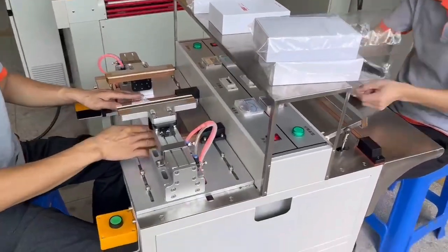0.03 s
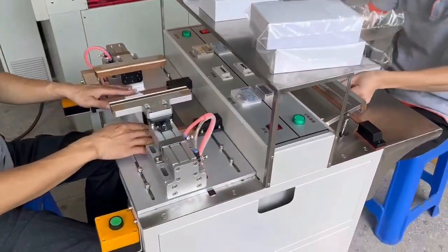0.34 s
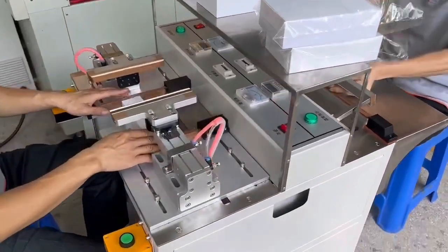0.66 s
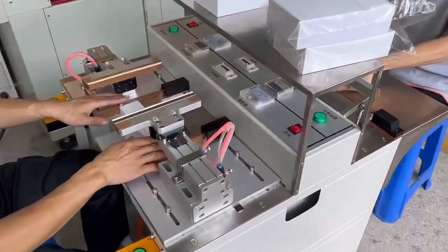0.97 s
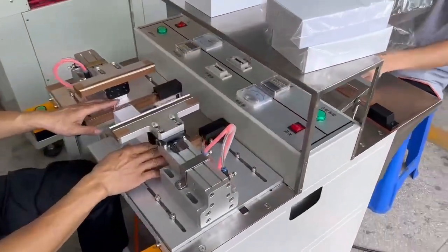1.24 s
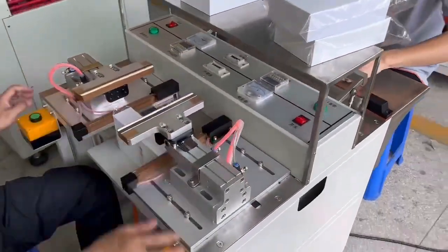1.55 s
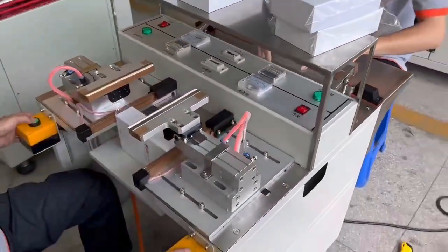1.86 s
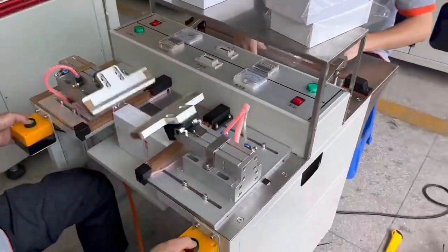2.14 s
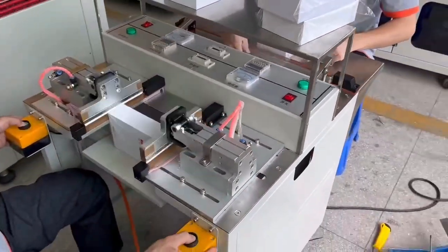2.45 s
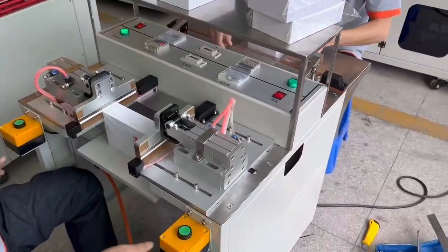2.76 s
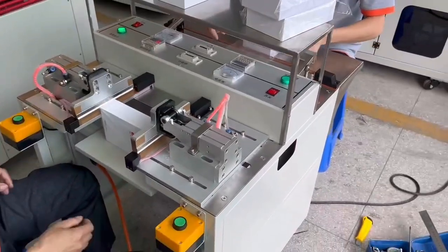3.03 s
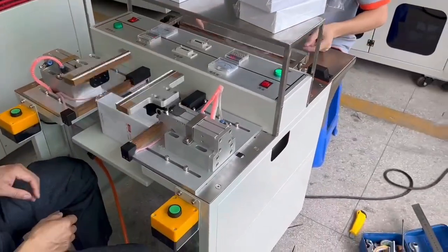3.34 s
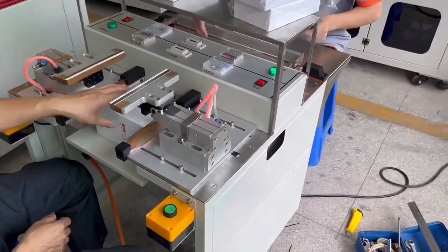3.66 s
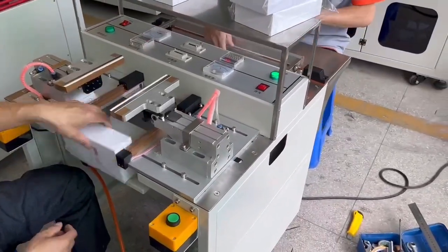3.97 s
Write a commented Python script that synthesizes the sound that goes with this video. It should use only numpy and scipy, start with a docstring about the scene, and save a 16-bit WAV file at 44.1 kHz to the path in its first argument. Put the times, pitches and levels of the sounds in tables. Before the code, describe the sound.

A pneumatic sealing machine hisses, thuds shut and clacks open over steady workshop hum.

```python
"""Pneumatic sealer in a workshop

The microphone stands near the machine, facing its muffler, with motors and fans humming around it.
Valves vent as the clamps thud shut; a second later they vent again and the jaws spring back
against their stops, clacking and setting the sheet-steel cabinet booming.
At the end of this one cycle a hand slides a wrapped box into place."""
import sys
import numpy as np
from scipy import signal
from scipy.fft import rfft, irfft, next_fast_len
from scipy.io import wavfile
from scipy.ndimage import uniform_filter1d, map_coordinates

SR = 44100
rng = np.random.default_rng(int(sys.argv[2]) if len(sys.argv) > 2 else 0)


def inscribe(sig):
    """Save sig as 16-bit PCM at rate SR to the path in sys.argv[1].

    A 1-D sig is mono; a 2-D sig holds one channel per row.
    Samples are clipped to [-1, 1] before scaling.
    """
    pcm = np.round(np.clip(np.atleast_2d(sig).T, -1, 1) * 32767)
    wavfile.write(sys.argv[1], SR, pcm.astype(np.int16))


N = 176400

# Spectra of the background machinery, low to high: freq_hz, density_db
BASS_SPECTRUM = [(25, -29), (48, -14), (58, 4), (67, -1), (80, -20), (130, -84)]
RUMBLE_SPECTRUM = [(10, -25), (22, -16), (36, -22), (55, -2.5), (78, -11), (105, -10.5), (132, -4.5),
                   (155, -9.5), (205, -11), (250, -5), (340, -5.5), (385, -6.5), (445, -13.5), (540, -12),
                   (700, -30), (850, -38), (1760, -83)]
DRONE_SPECTRUM = [(150, -58), (225, -15.5), (262, 5), (278, -2.5), (296, 5.5), (315, 5.5), (332, -17.5),
                  (450, -56.5)]
WHIRR_SPECTRUM = [(350, -25), (600, 0), (736, -3), (880, -2), (1070, -2), (1400, -5.5), (2000, -10.5),
                  (2500, -11.5), (2950, -15), (3500, -14.5), (4300, -19), (5500, -23.5), (7500, -27.5),
                  (10000, -67)]
HISS_SPECTRUM = [(7500, -43), (9000, -1.5), (11600, 5.5), (13000, -1), (14000, -17.5)]
# Swells of the drone and the bass under it: time_s, level_db
DRONE_SWELLS = [(0, -25.5), (.55, -20.5), (.75, -25), (1.08, -22), (1.42, -21.5), (1.55, -34.5),
                (1.88, -21.5), (2.1, -31), (2.8, -24), (3.05, -31.5), (3.7, -23), (4, -33)]
BASS_SWELLS = [(0, -49), (.1, -29.5), (.25, -52), (.36, -44), (.44, -24), (.56, -27), (.68, -43), (2, -36),
               (4, -37)]
# Motor and mains hum: pitch_hz, level_db, unsteadiness
HUM_TONES = [(56.6, -50, 0.64), (101.54, -31.5, 0.28), (181.4, -35, 0.69), (311.7, -38.5, 0.64),
             (564, -43, 0.93), (930, -48, 2.5)]
# Decay of the room: freq_hz, t60_s
ROOM_DECAY = [(150, 0.89), (1000, 0.74), (5000, 0.88), (12000, 0.44)]
# Rub of the wrapped box: freq_hz, density_db
BOX_SPECTRUM = [(60, -19), (150, 16), (380, -1), (600, -31), (1500, -35), (3500, -26), (6000, -39),
                (12000, -34)]
# Dead thuds of pistons and clamps: start_s, peak_db, pitch_hz, length_s
CLAMP_THUDS = [(1.993, -9.5, 540, 0.007), (1.988, -12.5, 140, 0.023), (2.133, -13.5, 233, 0.016),
               (2.165, -19, 486, 0.028), (2.205, -13, 273.5, 0.036), (2.361, -10.5, 282, 0.0243),
               (3.148, -14.5, 555, 0.0147), (3.187, -12.5, 174, 0.041), (3.214, -16, 112.2, 0.058)]
# Air let out by the valves: start_s, level_db, length_s, sag_db_per_s, sizzle_db
VALVE_VENTS = [(1.972, -28.5, .018, 39, 0), (1.991, -17, 0.038, 22, .5), (2.032, -22.5, 0.085, 36, .5),
               (2.118, -23.5, 0.06, 95, 1.5), (2.598, -33, .02, 90, -6), (3.007, -28.5, .014, 30, 0),
               (3.028, -19.5, 0.043, 130, 2), (3.075, -33.5, 0.04, 70, 2), (3.131, -28, .018, 60, -3),
               (3.150, -17, 0.032, 280, 5), (3.182, -32, 0.039, 150, 0), (3.254, -41, .04, 10, 3),
               (3.297, -33.5, 0.034, 70, -1), (3.97, -34, .04, 10, 3.5)]
# Hiss of the muffler: freq_hz, density_db
MUFFLER_SPECTRUM = [(300, -26), (1000, -4), (2200, 0.5), (3200, 4.5), (4600, 4), (5600, 3.5), (7000, 1),
                    (8000, -4.5), (9500, 0.5), (11600, 4), (13000, 2.5), (14000, 6)]
# Resonances and hollows of the air lines: centre_hz, width_hz, closing_db, opening_db
LINE_RESONANCES = [(2620, 130, -9, 0), (2830, 90, 8, 5), (3140, 70, -11, 2), (3330, 150, 7, 7),
                   (3560, 110, -8, -9), (3870, 90, 5, 0), (4110, 50, 7, 1), (4331, 35, 10, -5),
                   (4480, 70, 12, 15), (4698, 45, 6, 7), (4953, 45, 7, 3), (5170, 100, 9, 4),
                   (5410, 170, -11, -9), (5950, 80, 7, 11), (6370, 60, 5, 0), (6780, 110, 4, 7),
                   (11388, 90, 7, 4), (11665, 80, 3, 8)]
# The jaws hitting their stops: start_s, clack_db, boom_db
JAW_STRIKES = [(2.606, -31, -30.5), (3.027, -20, -31), (3.151, -40, -33), (3.181, -19.5, -27.5),
               (3.186, -16, -25), (3.193, -27, -18.5), (3.269, -17.5, -38), (3.321, -29, -28)]
# Clack of the jaws and shudder of the panels: freq_hz, density_db
CLACK_SPECTRUM = [(150, -13), (500, -1), (780, 6), (1100, 10), (1600, -4), (2200, 4), (3000, -13),
                  (4500, -2.5), (7000, -11.5), (10000, -42), (14000, -40)]
SHUDDER_SPECTRUM = [(50, -12), (110, 7), (160, 3), (240, -7), (370, 6), (460, -3.5), (600, -4.5),
                    (750, -16), (1200, -21), (2500, -29), (6000, -60)]
# Ring of the cabinet, relative to each boom: pitch_hz, level_db, t60_s
CABINET_MODES = [(104.7, -9, 0.98), (171.7, -8.5, 1.4), (218, -2.5, 0.82), (306.7, 1, 0.5),
                 (377.4, -1, 1.37), (464, -13, 0.4), (597, -8, 0.48), (965, -17, 0.86)]

RUMBLE_DB, DRONE_DB, HISS_DB = -23, -1.5, -57
WHIRR_DB, WHIRR_FADE_DB_PER_S = -31.5, 0.32
VENT_ATTACK_S, VENT_T60_S, PORT_CHANGE_S = 0.0025, 0.075, 2.9
SIZZLE_HZ, SPUTTER_DB = 8000, 1.2
CLACK_ATTACK_S, CLACK_T60_S, BOOM_ATTACK_S = 0.00048, 0.077, 0.0016
SHUDDER_DB, SHUDDER_T60_S, RATTLE_RADIANS = 6, 0.39, 0.5
ROOM_DB, VENT_SEND_DB = -6.5, -3


def amp(db):
    """Decibels to gain."""
    return 10 ** (np.asarray(db) / 20)


def unit(x):
    """Scale to rms 1."""
    return x / np.sqrt(np.mean(x ** 2) + 1e-20)


def since(start_s):
    """Seconds gone by since start_s, zero before it."""
    return np.maximum(np.arange(N) / SR - start_s, 0)


def along(points, hz):
    """Read (freq_hz, value) points on a log frequency axis."""
    freqs, values = np.transpose(points)
    return np.interp(np.log(hz + 1), np.log(freqs + 1), values)


def swell(points):
    """Gain per sample from (time_s, level_db) points."""
    return amp(np.interp(since(0), *np.transpose(points)))


def filtered(x, response):
    """Filter x by a gain that depends on frequency."""
    size = next_fast_len(N + SR // 2)
    return irfft(rfft(x, size) * response(np.fft.rfftfreq(size, 1 / SR)), size)[:N]


def wobble(rate_hz):
    """A smooth random curve with rate_hz knots a second."""
    return map_coordinates(rng.standard_normal(4000), [np.arange(N) * rate_hz / SR + 3], mode="wrap")


def noise(spectrum):
    """Coloured noise of rms 1."""
    return unit(filtered(rng.standard_normal(N), lambda hz: amp(along(spectrum, hz))))


def patchy(x, depth_db):
    """Let narrow bands swell and sink independently."""
    bands = signal.stft(x, nperseg=512)[2]
    field = uniform_filter1d(rng.standard_normal(bands.shape), 2, axis=0)
    field = unit(uniform_filter1d(field, 9, axis=1))
    return unit(signal.istft(bands * amp(depth_db * field), nperseg=512)[1][:N])


def machinery():
    """Room tone: motors hum and drone unsteadily over the rumble and whirr of fans."""
    t = since(0)
    out = amp(RUMBLE_DB + 0.16 * wobble(8.9)) * noise(RUMBLE_SPECTRUM)
    out += amp(DRONE_DB) * swell(DRONE_SWELLS) * noise(DRONE_SPECTRUM)
    out += swell(BASS_SWELLS) * noise(BASS_SPECTRUM)
    out += amp(WHIRR_DB - WHIRR_FADE_DB_PER_S * t) * patchy(noise(WHIRR_SPECTRUM), depth_db=1.8)
    out += amp(HISS_DB) * noise(HISS_SPECTRUM)
    for hz, db, unsteady in HUM_TONES:
        drift = unit(np.array([1 + unsteady * wobble(11), unsteady * wobble(11)]))
        phase = 2 * np.pi * (hz * t + rng.random())
        out += amp(db) * (drift[0] * np.sin(phase) + drift[1] * np.cos(phase))
    return out


def workshop(x):
    """The room's tail reaches the microphone 5 ms late and dies soonest in the high treble."""
    hz, t, bands = signal.stft(rng.standard_normal(SR), SR, nperseg=256)
    decay = amp(-60 * t / along(ROOM_DECAY, hz)[:, None])
    tail = signal.istft(bands * decay, SR, nperseg=256)[1]
    return signal.fftconvolve(x, np.pad(tail, (SR // 200, 0)) / np.linalg.norm(tail))[:N]


def near_panels(x, count=14, level_db=-8.5, latest_s=0.022):
    """Weak early reflections off hard panels close by comb the sound."""
    delays = rng.uniform(0.00211, latest_s, count)
    signs = rng.choice([-1, 1], count)
    echoes = sum(sign * np.pad(x, (int(delay * SR), 0))[:N] for delay, sign in zip(delays, signs))
    return (x + amp(level_db) * echoes / np.sqrt(count)) / np.hypot(1, amp(level_db))


def box_slide(middle_s=3.8, half_length_s=0.14, level_db=-30.5):
    """A wrapped box pushed by hand: a soft rub that swells and fades."""
    push = np.exp(-((since(0) - middle_s) / half_length_s) ** 2)
    return amp(level_db) * push * noise(BOX_SPECTRUM)


def clamps():
    """Cushioned contacts of pistons and clamps swell and die within a few cycles."""
    out = np.zeros(N)
    for start_s, db, hz, length_s in CLAMP_THUDS:
        t = since(start_s)
        contact = np.sin(np.pi * np.minimum(t / length_s, 1)) ** 2
        out += amp(db) * contact * np.sin(2 * np.pi * hz * t)
    return out


def exhaust_port(opening):
    """The muffler's hiss through the resonances of the opening or the closing port."""
    def response(hz):
        return amp(sum((opening_db if opening else closing_db) / (1 + (2 * (hz - centre) / width) ** 2)
                       for centre, width, closing_db, opening_db in LINE_RESONANCES))
    return unit(filtered(noise(MUFFLER_SPECTRUM), response))


def valves():
    """Each valve snaps open, the pressure sags and the sputtering flow stops."""
    body_power, sizzle_power = np.zeros((2, N))
    for start_s, db, length_s, sag_db_per_s, sizzle_db in VALVE_VENTS:
        t = since(start_s)
        attack = 1 - np.exp(-t / VENT_ATTACK_S)
        shutoff_db = 60 * since(start_s + length_s) / VENT_T60_S
        power = (amp(db - sag_db_per_s * t - shutoff_db) * attack) ** 2
        body_power += power
        sizzle_power += power * amp(sizzle_db) ** 2
    hiss = np.where(since(PORT_CHANGE_S) > 0, exhaust_port(opening=True), exhaust_port(opening=False))
    body = filtered(hiss, lambda hz: 1 / (1 + (hz / SIZZLE_HZ) ** 12))
    sputter = amp(SPUTTER_DB * wobble(130))
    return sputter * (np.sqrt(body_power) * body + np.sqrt(sizzle_power) * (hiss - body))


def jaws():
    """Each strike is a dense steel clack, then a shudder and a longer, rattling ring of the cabinet."""
    out = np.zeros(N)
    rings = [np.sin(2 * np.pi * hz * since(0) + RATTLE_RADIANS * wobble(39.2))
             for hz, _, _ in CABINET_MODES]
    for start_s, clack_db, boom_db in JAW_STRIKES:
        t = since(start_s)
        attack = 1 - np.exp(-t / CLACK_ATTACK_S)
        out += amp(clack_db - 60 * t / CLACK_T60_S) * attack * noise(CLACK_SPECTRUM)
        panels = amp(SHUDDER_DB - 60 * t / SHUDDER_T60_S) * noise(SHUDDER_SPECTRUM)
        for (_, db, t60_s), ring in zip(CABINET_MODES, rings):
            shift = int(start_s * SR) - rng.integers(500)  # a new phase at each strike
            panels += amp(db - 60 * t / t60_s) * np.roll(ring, shift)
        out += amp(boom_db) * (1 - np.exp(-t / BOOM_ATTACK_S)) * panels
    return out


def scene():
    """The sealer in its room, in mono; the muffler beams at the microphone and sounds drier."""
    air = near_panels(valves())
    mechanism = near_panels(jaws() + box_slide()) + clamps()
    room = amp(ROOM_DB) * workshop(mechanism + amp(VENT_SEND_DB) * air)
    return (air + mechanism + room + machinery())[None]


def record(dry, notch_hz=8510, notch_reach_hz=470, top_hz=14080):
    """The recorder behind the microphone has a deep treble notch and a steep band limit."""
    def response(hz):
        notch_db = -60 * np.clip((notch_reach_hz - abs(hz - notch_hz)) / 300, 0, 1) ** 2
        rolloff_db = -0.3 * np.clip(hz - top_hz, 0, 400)
        return amp(notch_db + rolloff_db)
    return filtered(dry[0], response)[None]


dry = scene()
out = record(dry)
inscribe(out)
```